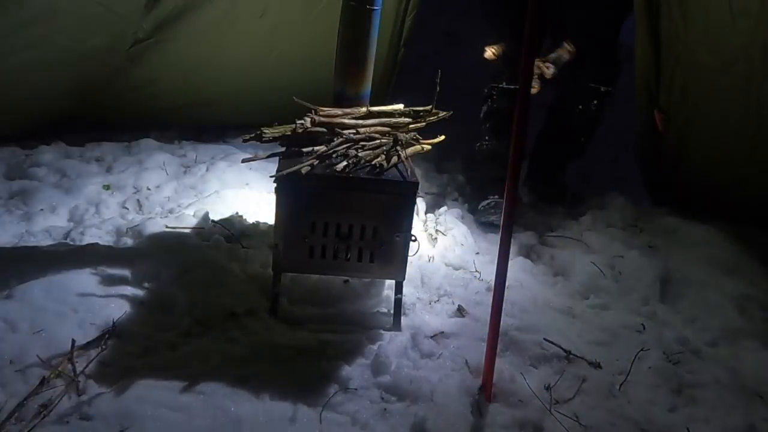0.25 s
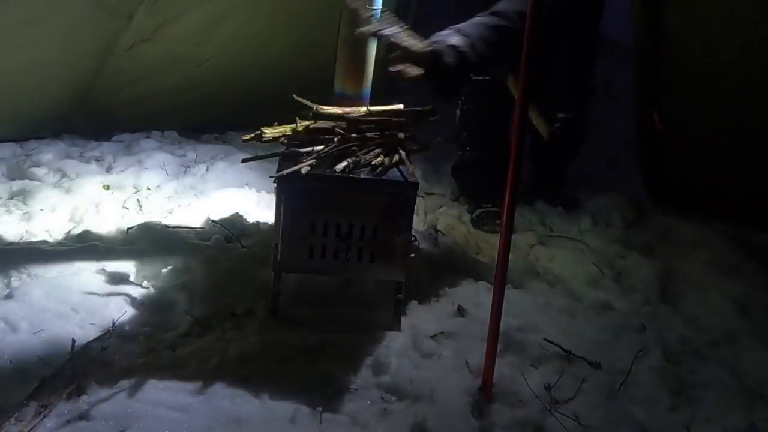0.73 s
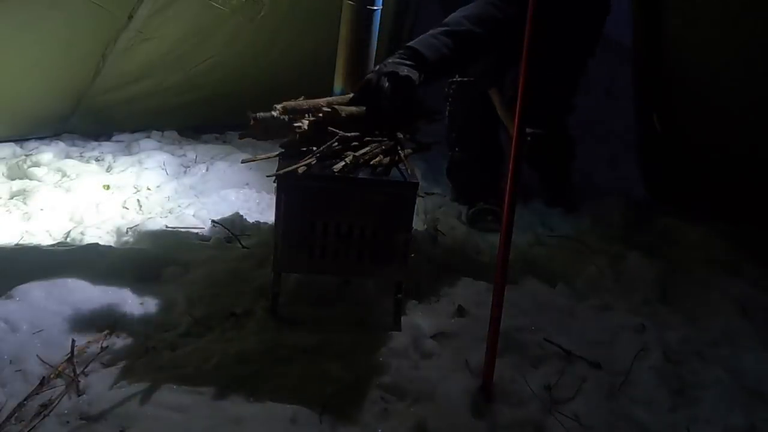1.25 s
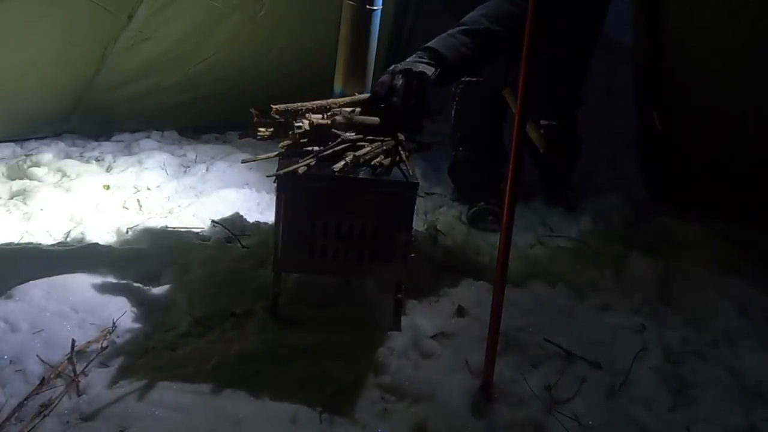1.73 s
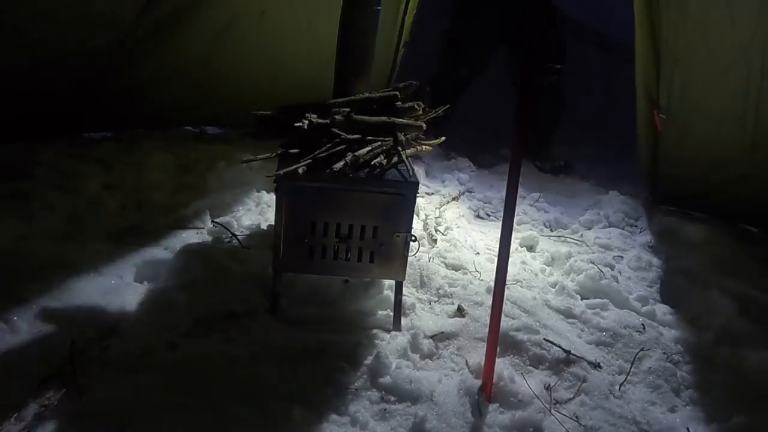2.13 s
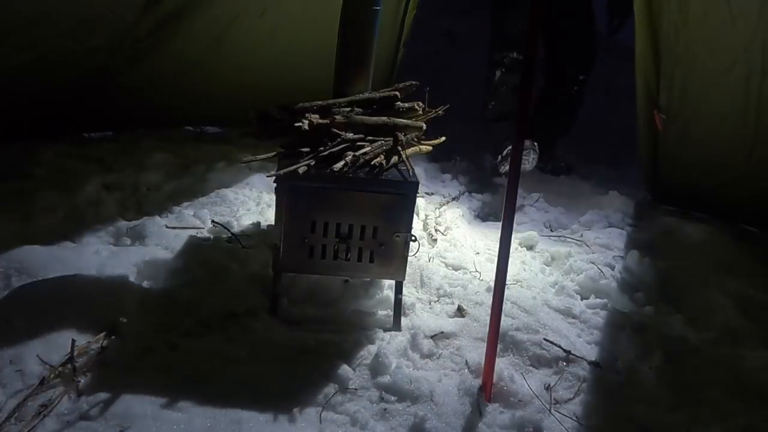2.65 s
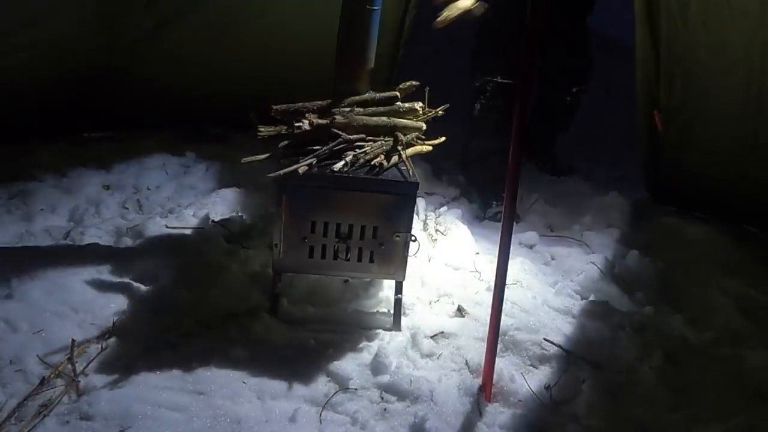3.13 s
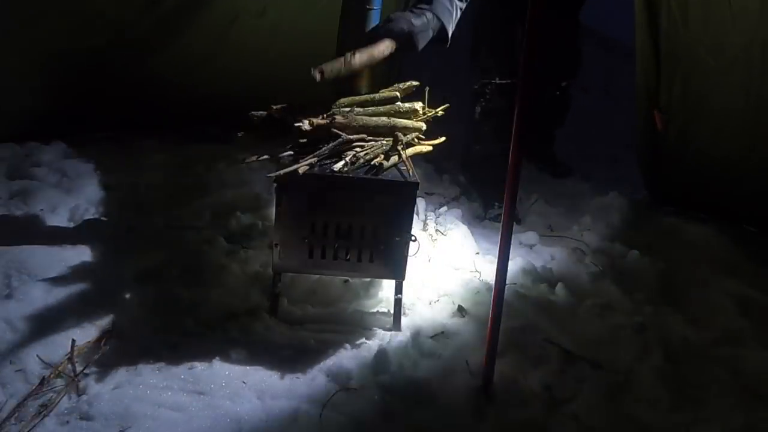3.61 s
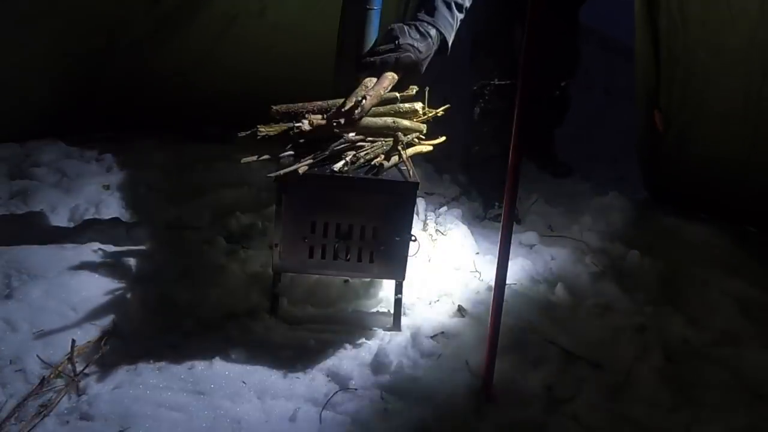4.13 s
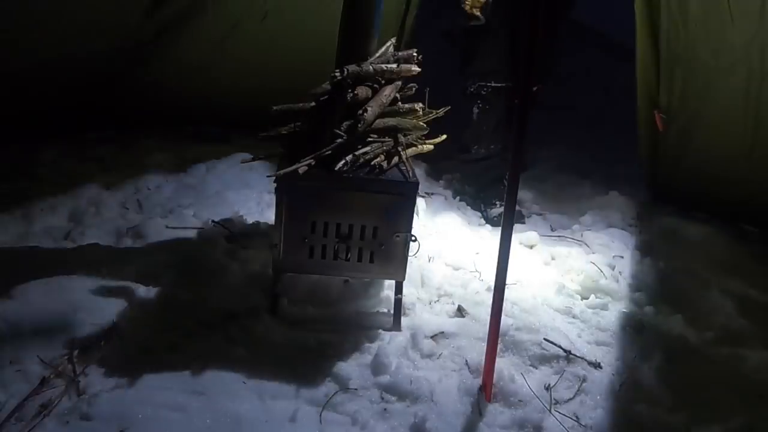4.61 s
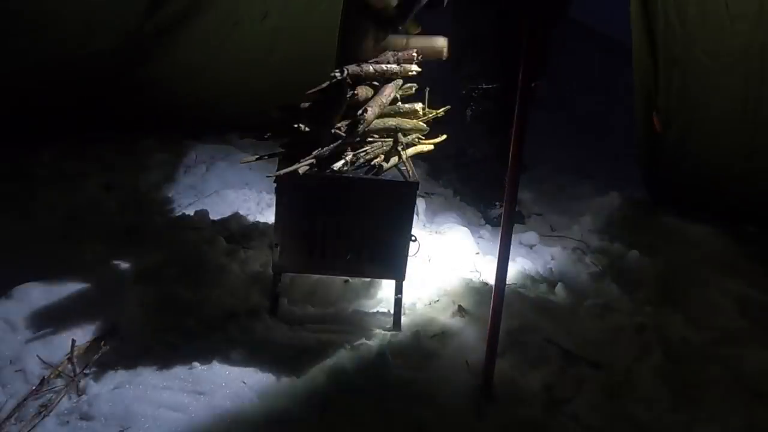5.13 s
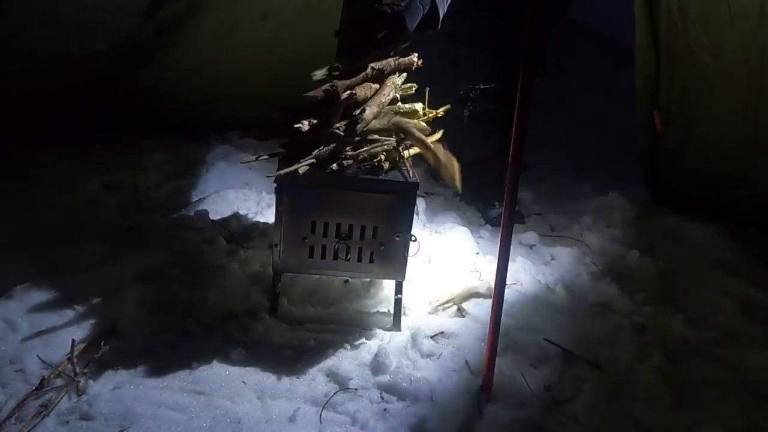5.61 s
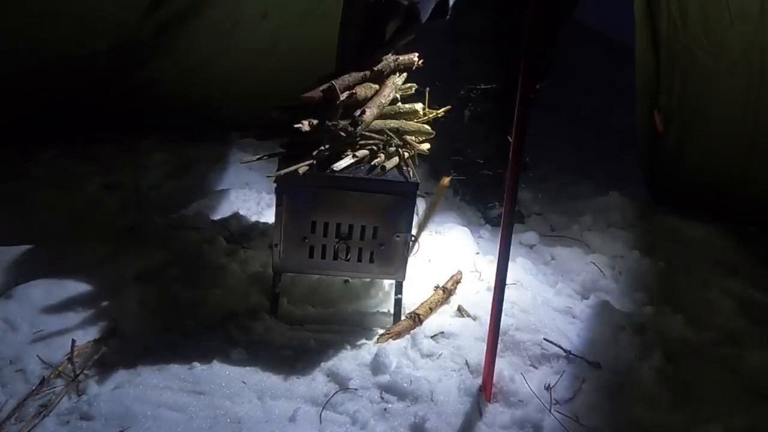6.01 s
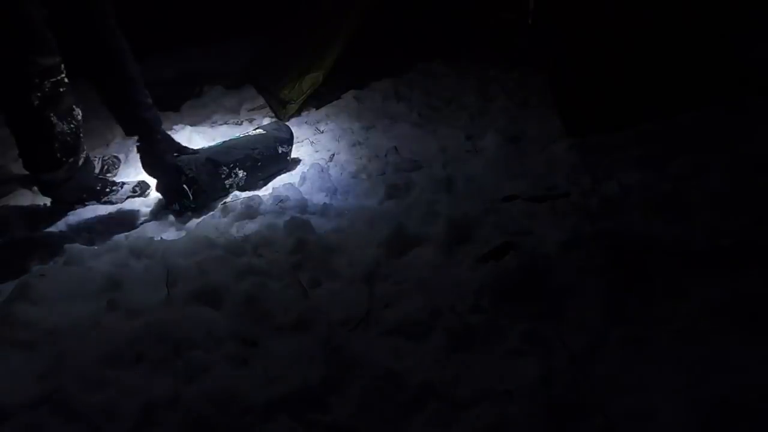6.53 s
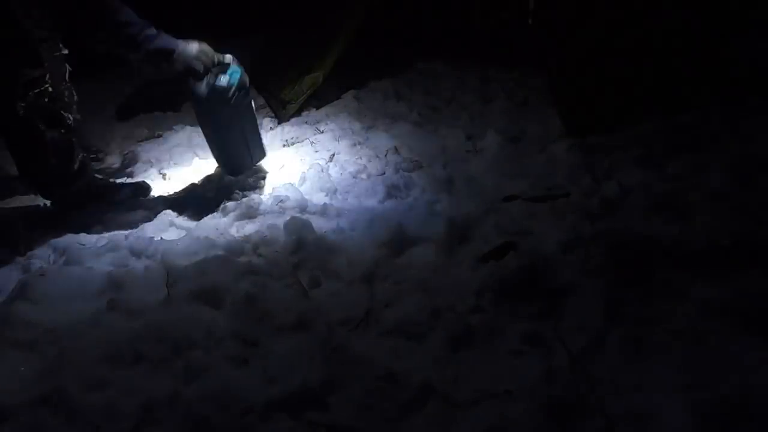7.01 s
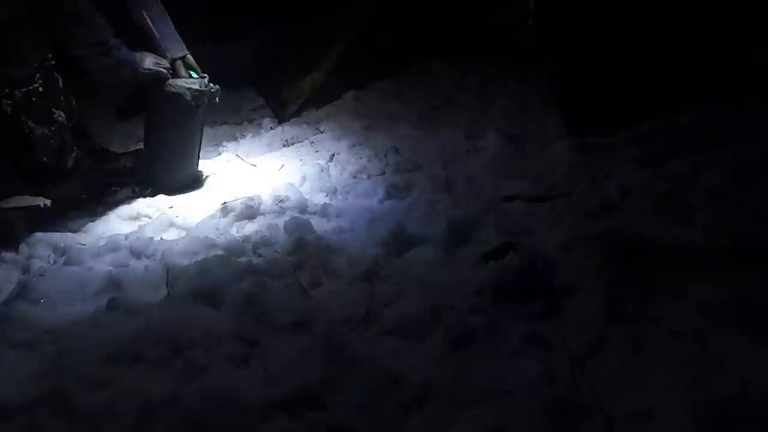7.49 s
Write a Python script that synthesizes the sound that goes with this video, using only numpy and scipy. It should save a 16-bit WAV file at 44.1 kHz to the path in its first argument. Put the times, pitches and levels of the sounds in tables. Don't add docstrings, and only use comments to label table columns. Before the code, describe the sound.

Inside a quiet tent at night, sleeves rustle and boots crunch softly in snow. A bright twig snap leads into sticks clattering onto a hollow metal stove box. After lighter ticks, more wood knocks down, ending with a hard thump and a stick rattling off. Then a stiff bag crackles and is set down in snow. Close stereo microphone, faint low wind, very short dull canvas echoes.

```python
import sys
import numpy as np
from scipy import signal
from scipy.fft import rfft, irfft, next_fast_len
from scipy.io import wavfile

SR = 44100
rng = np.random.default_rng(int(sys.argv[2]) if len(sys.argv) > 2 else 0)


def linear_from_db(decibels):
    return 10 ** (np.asarray(decibels, float) / 20)


def master_out(mix):
    frames = np.transpose(np.atleast_2d(mix))
    ceiling = np.clip(frames, -1, 1)
    pcm = np.round(ceiling * 32767).astype(np.int16)
    wavfile.write(sys.argv[1], SR, pcm)


N = 342216
BAG_FROM_S = 6.45


def rms_one(x):
    return x / np.sqrt(np.mean(x ** 2) + 1e-20)


def peak_one(x):
    return x / np.abs(x).max()


def at_hz(points, hz):
    table_hz, values = np.transpose(points)
    return np.interp(np.log(hz), np.log(table_hz), values)


def band(x, low_hz, high_hz):
    return signal.sosfilt(signal.butter(2, [low_hz, min(high_hz, 19000)], "band", fs=SR, output="sos"), x)


def resonance(x, hz, width_hz):
    r = np.exp(-np.pi * width_hz / SR)
    poles = [1, -2 * r * np.cos(2 * np.pi * hz / SR), r * r]
    return signal.lfilter([(1 - r * r) / 2, 0, (r * r - 1) / 2], poles, x)


def decay(t, t60_s):
    return linear_from_db(-60 * t / t60_s)


def drift(rate_hz):
    r = np.exp(-80 * np.pi * rate_hz / SR)
    slow = signal.lfilter([1], [1, -2 * r, r * r], rng.standard_normal(N // 40 + 2002))[2000:]
    return np.interp(np.arange(N) / 40, np.arange(len(slow)), rms_one(slow))


def grains(per_s, spread_db):
    sizes = linear_from_db(spread_db * np.minimum(rng.exponential(1, (4, N)), 5)) * rng.standard_normal((4, N))
    return sizes * (rng.random((4, N)) < per_s / SR) + 1e-18


# f/Hz, likeness
LIKENESS = [(60, 1), (180, 0.51), (550, 0.66), (1650, 0.97), (4970, 0.89), (9000, 0.92), (15000, 0.5)]


def colour(source, spectrum, patchy_db, gain_by_hz=lambda hz: 1):
    out, power = 0, 0
    edges_hz = 20 * 2 ** np.arange(0, 9.7, 1 / 3)
    for k, (low, high) in enumerate(zip(edges_hz, edges_hz[1:])):
        hz = np.sqrt(low * high)
        if hz < .8 * spectrum[0][0]:
            continue
        mid, side = band(source[k % 2::2], low, high)
        alike = np.clip(at_hz(LIKENESS, hz), 0, 1)
        stereo = np.sqrt(1 + alike) * mid + np.sqrt(1 - alike) * side * [[1], [-1]]
        part = linear_from_db(at_hz(spectrum, hz) + patchy_db * drift(9.9)) * stereo
        power += np.mean(part ** 2)
        out = out + part * gain_by_hz(hz)
    return out / np.sqrt(power)


# f/Hz, density/dB per Hz
NIGHT = [(59, -50), (100, -31), (131, -9), (236, -4.5), (262, -9.5), (849, -32), (2690, -24), (2860, -25.5),
         (5480, -21), (11900, -35), (15000, -66)]


def night_air():
    return linear_from_db(-63) * colour(rng.standard_normal((4, N)), NIGHT, 2.0)


# t/s, level/dB
GUSTS = [(0.0, -67), (1.34, -57.5), (1.601, -62), (2.9, -60), (3.3, -64), (3.8, -56), (4.93, -75.5),
         (5.3, -54.5), (5.55, -62), (6.1, -65), (6.35, -57.5), (7.07, -64.5), (7.76, -57.5)]


def gusts():
    s, gust_db = np.transpose(GUSTS)
    air = resonance(rng.standard_normal(N), 62.3, 24) + .5 * band(rng.standard_normal(N), 21, 56)
    level_db = np.interp(np.arange(N) / SR, s, gust_db) + 4.2 * drift(28)
    return linear_from_db(level_db) * rms_one(band(air, 19, 122)) * [[linear_from_db(-.5)], [linear_from_db(.5)]]


def bump():
    start_s, peak_db = .301, -25
    out, t = np.zeros(N), np.arange(SR // 20) / SR
    swing = np.minimum(t / 0.00066, 1) * np.cos(2 * np.pi * 110 * t) * np.exp(-t / 0.0024)
    out[round(start_s * SR):][:len(t)] = linear_from_db(peak_db) * swing
    return out


def gesture(t, s, hold_s, db, change_db, rise_s, fall_s):
    edge = np.maximum(s - t, 0) / max(rise_s, .005) + np.maximum(t - s - hold_s, 0) / max(fall_s, .005)
    return linear_from_db(db + change_db * np.clip((t - s) / max(hold_s, .005), 0, 1) - 20 * np.minimum(edge, 5))


MOVE_RISE_S, MOVE_FALL_S, MOVE_CRUNCH_DB = 0.078, 0.055, -8
SETTLE_RISE_S, SETTLE_FALL_S, STROKE_EDGE_S = 0.02, 0.11, 0.015
STILL_DB = -80.5
DULL_PER_WEIGHT, BRIGHT_DB, BAG_DULL_DB = 0.37, -3.5, -6.5


def squeak():
    start_s, length_s, level_db, seam_hz = 2.3, 0.33, -67.5, 2580
    out, t = np.zeros(N), np.arange(SR) / SR + start_s - .2
    tone = rms_one(resonance(rng.standard_normal(SR), seam_hz, 450))
    stroke = gesture(t, start_s, length_s, level_db, -1.0, MOVE_RISE_S, 0.063)
    out[round(t[0] * SR):][:SR] = stroke * tone
    return out


# t/s, length/s, level/dB, change over move/dB, weight/dB
MOVES = [(0, 0.34, -56.5, 1, -3.5), (0.382, 0.16, -50, -0.5, -7.5), (0.564, 0.26, -53, -2, -5),
         (0.895, 0.05, -57.5, 3.5, 13), (0.978, 0.17, -58, -5.5, 8), (1.606, 0.15, -62, 4, 8.5),
         (1.825, 0.26, -58, -18, 8), (2.054, 0.2, -55, 3.5, -6), (2.302, 0.28, -60.5, -11.5, -15),
         (2.879, 0.34, -56, 1.5, 1.5), (3.603, 0.28, -62, -1.5, -2), (3.907, 0.21, -56, -7.5, 6),
         (4.185, 0.13, -56, -2.5, 6.5), (4.428, 0.29, -59, -5.5, 3.5), (4.799, 0.46, -47.5, -2.5, -9),
         (5.316, 0.29, -54, 2, 7), (5.725, 0.17, -49, -10, 3.5), (6.078, 0.14, -64.5, 10, 0),
         (6.238, 0.19, -57.5, -1, -2), (6.442, .08, -60.5, 2, -0.5), (6.545, .07, -54.5, 1, 1.5),
         (6.63, 0.51, -53.5, 5.5, -3), (7.192, 0.2, -58.5, -2, 5.5), (7.402, 0.08, -46.5, 10, -15),
         (7.562, 0.18, -52, -11.5, -1)]
# t/s, hold/s, level/dB, weight/dB, crunch/dB
SETTLES = [(0.785, 0.058, -51, 9.5, 9.5), (1.187, 0.07, -40.5, 7, 0), (1.5, 0.018, -54.5, 13.5, -1),
           (3.854, 0.015, -52.5, 12.5, -3), (4.147, 0.0095, -43, 2, -0.5), (4.37, .01, -68, 23, 12),
           (5.265, 0.061, -47.5, -4, -2.5), (5.637, .02, -56, 22.5, 2), (5.662, 0.0081, -37.5, 3.5, 4),
           (5.99, 0.012, -46.5, 18.5, 4), (6.607, 0.011, -49.5, 8, 1.5), (6.914, 0.058, -49, -1, 3.5),
           (7.427, 0.024, -46.5, 6, 12.5), (7.614, 0.0063, -47, -0.5, -2)]
# t/s, length/s, level/dB, change over stroke/dB, weight/dB
STROKES = [(1.193, .11, -36, -11.5, 1), (1.414, 0.1, -65, 6, 14), (1.463, .035, -62, 0, 0),
           (4.23, .025, -53, 0, 0), (4.29, .02, -54, -2, -4), (4.472, 0.052, -58, 0, -1),
           (5.908, 0.011, -44, 0.5, 0), (7.39, .04, -57, 4, 0), (1.648, 0.068, -56, 0.5, -10),
           (2.819, 0.072, -53, 0, -3), (3.245, 0.32, -51.5, 3.5, -7.5), (4.137, 0.034, -43, 2.5, -8),
           (4.331, 0.028, -46, -0.5, 7), (5.665, 0.0089, -32, -3, 1), (6.84, 0.074, -57.5, 5, 5.5),
           (7.13, 0.047, -57, 0, -7), (7.488, 0.022, -44.5, 6, -16)]


def handling():
    t = np.arange(0, N / SR, .002)
    rows = [(gesture(t, s, length, db, change_db, MOVE_RISE_S, MOVE_FALL_S), weight_db, MOVE_CRUNCH_DB)
            for s, length, db, change_db, weight_db in MOVES]
    rows += [(gesture(t, s, hold, db, 0, SETTLE_RISE_S, SETTLE_FALL_S), weight_db, crunch_db)
             for s, hold, db, weight_db, crunch_db in SETTLES]
    rows += [(gesture(t, s, length, db, change_db, STROKE_EDGE_S, STROKE_EDGE_S), weight_db, MOVE_CRUNCH_DB)
             for s, length, db, change_db, weight_db in STROKES]
    rows += [(linear_from_db(STILL_DB), 3.0, MOVE_CRUNCH_DB)]
    swish = 10 * np.log10(sum(gain ** 2 for gain, weight_db, crunch_db in rows))
    boom = 10 * np.log10(sum((gain * linear_from_db(weight_db)) ** 2 for gain, weight_db, crunch_db in rows))
    crunch = 10 * np.log10(sum((gain * linear_from_db(crunch_db)) ** 2 for gain, weight_db, crunch_db in rows))
    bright = BRIGHT_DB - DULL_PER_WEIGHT * (boom - swish) + BAG_DULL_DB * (t > BAG_FROM_S)
    return [np.interp(np.arange(N) / SR, t, curve) for curve in (swish, bright, crunch, boom)]


# f/Hz, density/dB per Hz
SWISH = [(410, -6), (700, -2), (848, -34.5), (1300, 13.5), (1590, -16.5), (1930, 8), (2340, -2.5),
         (2980, -2.5), (3430, -2.5), (6350, -3), (12200, -18), (13700, -10), (15000, -36)]
# f/Hz, width/Hz, level/dB
WEAVE = [(1350, 180, -5), (2655, 41, -8), (3810, 490, -10)]


def sleeves(swish_db, bright_db):
    def tilt(hz):
        if hz <= 2500:
            return 1
        return linear_from_db((bright_db + 1.0) * np.clip(np.log2(hz / 2500) / 2.2, 0, 1))

    rub = colour(grains(5000, 0.54), SWISH, 1.83, tilt)
    rub = rub + sum(linear_from_db(db + 2.5 * drift(18.0)) * resonance(rub, hz, width) for hz, width, db in WEAVE)
    clumps_db = np.where(np.arange(N) > BAG_FROM_S * SR, 3.5, 1) * drift(150)
    return linear_from_db(swish_db + 0.5 + 1.0 * drift(5.7) + clumps_db) * rub


def snow(crunch_db):
    crust = grains(900, 2.04)
    out = sum(resonance(crust[k], hz, 155) for k, hz in enumerate((545, 645, 986, 1450)))
    return linear_from_db(crunch_db - 3.5) * rms_one(out)


def snap_bursts(table):
    out, t = np.zeros(N + SR), np.arange(SR // 10) / SR
    for s, db, hz, top_db, t60 in table:
        white = rng.standard_normal(len(t))
        burst = (white + 9.8 * (t == 0)) * decay(t, np.clip(t60, .003, .1))
        ring = peak_one(resonance(burst, hz, max(0.15 * hz, 300)))
        low = ring + 0.67 * peak_one(band(burst, 0.52 * hz, 1.37 * hz))
        top = peak_one(band(burst, 5800, 7170))
        out[round(s * SR):][:len(t)] += linear_from_db(db - 0.5) * peak_one(low + linear_from_db(top_db) * top)
    return out[:N]


# t/s, peak/dB, ring f/Hz, top/dB
POPS = [(1.205, -30, 1100, -15), (1.26, -28, 2500, -8), (1.275, -35, 2000, -10), (2.845, -40, 1400, -15),
        (4.045, -44, 2800, -18), (4.565, -51, 1600, -20), (4.635, -44.5, 1390, -20),
        (4.4215, -45, 10000, -10), (4.4385, -39, 10000, -5), (6.148, -33, 10000, -5),
        (6.5336, -20, 2000, -27), (6.569, -41, 1900, -15), (6.6065, -28.5, 4500, -9),
        (6.725, -35, 4000, -11), (6.928, -32, 3200, -10), (6.634, -28, 1480, -20), (6.689, -43, 2170, -20),
        (6.742, -37, 1700, -20), (6.812, -34.5, 2500, -10), (6.83, -42, 1260, -20), (6.869, -36, 1830, -20),
        (6.895, -43, 2200, -15), (6.945, -33, 1200, -15), (6.986, -29, 1700, -15), (7.02, -44, 1000, -15),
        (7.046, -40, 1380, -10), (7.09, -38, 1300, -15), (7.433, -28, 1110, -15), (7.455, -27, 900, -15),
        (7.472, -26, 1500, 1), (7.49, -32, 1500, -8), (7.508, -30, 2500, -2), (7.556, -37, 2290, -20)]


def pops():
    return snap_bursts([row + (.014,) for row in POPS])


# t/s, peak/dB, ring f/Hz, top/dB
CREASES = [(6.505, -39.5, 1260, -25), (6.533, -28, 2630, -33), (6.616, -32, 1540, -22),
           (6.646, -28.5, 2150, -20), (6.724, -28, 1890, -38), (6.782, -30.5, 1450, -14),
           (6.803, -30.5, 1200, -18), (6.908, -31.5, 930, -12), (6.927, -22.5, 1140, -24),
           (6.978, -31, 1145, -21), (7.002, -28, 1070, -14), (7.081, -37, 1350, -14), (7.11, -32, 977, -18),
           (7.137, -37, 2110, -12), (7.226, -38.5, 1490, -15), (7.265, -31.5, 1340, -25),
           (7.442, -44, 1160, -25), (7.4625, -24.5, 1480, -2), (7.518, -26, 1540, -3),
           (7.548, -35, 1370, -10), (7.618, -29, 1220, -12), (7.676, -31.5, 2000, -22),
           (7.693, -42, 1730, -8), (7.727, -36, 1460, 0)]


def creases():
    return snap_bursts([row + (0.026,) for row in CREASES])


# t/s, peak/dB, ring f/Hz, top/dB
TICKS = [
    (0.301, -37, 1280, -12),
    (2.124, -35.5, 1580, -23),
    (2.891, -30, 1560, -25),
    (2.906, -36, 1680, -25),
    (3.008, -26, 2080, -30),
    (3.098, -29.5, 2220, -31),
    (4.495, -36, 1490, -12),
    (6.3, -33.5, 2380, -20),
]
# t/s, peak/dB, ring f/Hz, top/dB, t60/s
SNAPS = [(0.7965, -8, 3600, -8, 0.029), (0.7986, -7.5, 4800, -9, 0.018), (1.1375, -31, 2780, -24, 0.023),
         (1.4747, -38, 6200, -9, 0.042), (3.6154, -40.5, 4020, -24, 0.034),
         (3.684, -40.5, 4040, -10, 0.035), (3.917, -27.5, 3580, -28, 0.043), (4.4222, -41, 3480, -2, 0.022),
         (4.436, -40, 5730, -11, 0.033), (5.361, -38, 4670, -5, 0.038), (5.5777, -20, 5030, -27, 0.042),
         (5.5755, -27, 2650, -11, 0.035), (6.6057, -29, 3900, -38, 0.0078),
         (7.1631, -31.5, 3000, -25, 0.037)]


def twigs():
    return snap_bursts([row + (0.015,) for row in TICKS] + SNAPS)


# f/Hz, width/Hz, level/dB
BOX = [(115, 13, -9.5), (144, 53, 0.5), (202, 33, 2), (264, 66, 1), (334, 74, -0.5), (406.7, 45.5, -4),
       (603, 46, -14)]


def box(drive):
    return sum(linear_from_db(db) * (-1) ** k * resonance(drive, hz, width) for k, (hz, width, db) in enumerate(BOX))


def rumble(rumble_db):
    return linear_from_db(rumble_db - 4.0) * rms_one(box(grains(700, 3.2)[0]))


# t/s, peak/dB, boom f/Hz, t60/s
THUDS = [(0.779, -36.5, 264, 0.098), (0.825, -29.5, 300, 0.096), (0.843, -31, 268, 0.066),
         (1.176, -20.5, 239, 0.056), (1.191, -25, 106.4, 0.5), (1.22, -19, 284, 0.078),
         (1.245, -21.5, 315, 0.12), (1.319, -29.5, 146.3, 0.16), (1.502, -30, 236, 0.092),
         (1.773, -34.5, 297.6, 0.19), (3.839, -30, 174, 0.072), (3.87, -35, 313, 0.19),
         (4.341, -27.5, 311.4, 0.092), (5.228, -27, 317, 0.087), (5.369, -38, 250, 0.091),
         (5.413, -36, 345, 0.087), (5.493, -33, 358, 0.084), (5.593, -21, 260, 0.072),
         (5.661, -25.5, 278, 0.05), (5.67, -25, 301, 0.12), (5.704, -30, 271, 0.06),
         (5.784, -39, 139, 0.11), (5.905, -35, 147, 0.07), (5.982, -12, 282, 0.058),
         (6.006, -28, 265.6, 0.35), (6.724, -36.5, 242, 0.3), (7.261, -41, 264, 0.08),
         (7.437, -26.5, 230, 0.089), (7.48, -26, 230, 0.075), (7.614, -44, 229, 0.085)]


def thuds():
    out, t = np.zeros(N + SR), np.arange(SR // 3) / SR
    for s, db, hz, t60 in THUDS:
        white = rng.standard_normal(len(t))
        t60 = np.clip(t60, .015, .4)
        boom = np.sin(2 * np.pi * hz * t) * decay(t, t60) * np.minimum(t / 0.0038, 1)
        heave = np.sin(2 * np.pi * 0.335 * hz * t) * decay(t, 1.6 * t60)
        body = peak_one(band(box(white * decay(t, 1.25 * t60)), 0.61 * hz, 3.5 * hz))
        out[round(s * SR):][:len(t)] += linear_from_db(db - 0.8) * peak_one(boom + 0.78 * body + 0.076 * heave)
    return out[:N]


# t/s, peak/dB, f/Hz, t60/s
RINGS = [(.797, -22.5, 7500, 0.029), (.902, -46, 2600, 0.074), (.903, -48, 3620, 0.18),
         (1.187, -28, 4000, .06), (1.188, -31, 6130, .05), (1.2, -28, 1000, .05), (1.247, -28, 1500, .06),
         (1.222, -32, 4020, .05), (1.675, -50, 2740, 0.21), (2.822, -48, 1650, 0.26),
         (3.455, -48, 2900, .2), (3.47, -47, 1910, 0.23), (5.577, -30, 4730, .04), (6.0, -37, 747, 0.13),
         (6.305, -43.5, 140, .3), (1.227, -20, 268, 0.056), (1.245, -31, 295, .06),
         (5.416, -36, 570, 0.066), (5.493, -34.5, 587, 0.1), (5.493, -37, 1427, 0.13),
         (5.575, -33, 1140, 0.059), (5.577, -35, 2700, 0.037), (5.595, -23, 330, .06),
         (5.597, -39, 546, 0.074), (5.666, -30.5, 2120, 0.09), (5.6, -38, 1550, .06),
         (5.666, -33.5, 1430, 0.19), (5.668, -29.5, 923, 0.096), (5.984, -30.5, 564, 0.33),
         (5.985, -37, 1006, 0.22), (5.984, -34, 1437, 0.12), (5.988, -25.5, 1873, 0.091),
         (5.988, -38, 2283, .12), (5.988, -30, 2961, .08), (6.058, -21.5, 2740, 0.062),
         (6.058, -31, 1110, 0.096), (6.075, -34, 1427, .07), (6.076, -36, 1755, 0.11),
         (6.147, -53, 2740, 0.049), (6.3, -40.5, 523, 0.031), (7.262, -42.5, 620, .06)]


def rings():
    out, t = np.zeros(N + SR), np.arange(SR // 2) / SR
    for s, db, hz, t60 in RINGS:
        white = rng.standard_normal(len(t))
        waver = .9 * np.sin(2 * np.pi * hz * t) + .4 * rms_one(resonance(white, hz, 40 + .05 * hz))
        fade = linear_from_db(db) * decay(t, np.clip(t60, .02, .5))
        out[round(s * SR):][:len(t)] += fade * np.minimum(t / 0.0014, 1) * waver
    return out[:N]


# f/Hz, level/dB
STICK = [(1110, -1), (1430, 8), (1790, 11), (2770, -7)]


def rebound():
    start_s, peak_db = 6.056, -24
    out, t = np.zeros(N), np.arange(SR // 8) / SR
    rattle = rng.standard_normal(len(t)) * np.minimum(t / .004, 1) * decay(t, 0.099)
    ring = sum(linear_from_db(db) * peak_one(resonance(rattle, hz, 97)) for hz, db in STICK)
    out[round(start_s * SR):][:len(t)] = linear_from_db(peak_db) * peak_one(ring)
    return out


# f/Hz, level/dB
PLATE = [(990, -11), (1150, -8), (1440, 2.5), (1800, -3), (2100, -8), (2760, -0.5), (4050, -1), (5040, -43)]
# t/s, peak/dB, ring f/Hz, top/dB, ring/dB
KNOCKS = [(1.18, -15.5, 1487, -27, 5), (1.184, -21, 5030, -10, 23), (1.198, -39, 985, -13, 12),
          (1.247, -18.5, 1180, -13, -11), (1.774, -39, 1450, 10, 2), (1.825, -32, 973, 4.5, -8),
          (3.498, -35, 1270, -15, 2), (3.867, -44, 990, -10, 6), (4.132, -23, 1540, 25, 14),
          (4.235, -33, 1510, 0, -10), (5.228, -23.5, 1440, 4.5, 0.5), (5.416, -26, 960, -12, -8),
          (5.597, -23.5, 1520, -11, -10), (5.657, -15, 3400, -4, -13), (5.804, -32.5, 5270, -15, 14),
          (5.908, -22.5, 4600, -20, -12), (5.946, -30, 4600, -4, 7), (6.057, -30, 2720, -31, 14),
          (6.147, -33, 5700, -9, -10)]
# t/s, peak/dB, ring f/Hz, top/dB, ring/dB
SLIDES = [(.903, -37.5, 2570, -34, -13), (1.225, -27, 1050, -10, 3), (1.503, -36.5, 1350, -3, 0),
          (2.889, -34.5, 1600, -13, -8), (3.252, -33, 3760, -7, -4), (3.841, -29.5, 1367, -2, -10),
          (4.158, -29.5, 1497, -16, -8), (4.341, -29.5, 1340, -13, -12), (5.259, -20.5, 1420, 15, -6),
          (5.492, -30.5, 1257, -25, -9), (5.984, -9.5, 1385, 0.5, -10.5), (7.431, -29, 1180, -18, 4)]


def clacks():
    knock_t60_s, slide_t60_s = 0.13, 0.18
    out, t = np.zeros(N + SR), np.arange(SR // 4) / SR
    table = [row + (knock_t60_s,) for row in KNOCKS] + [row + (slide_t60_s,) for row in SLIDES]
    for s, db, hz, top_db, ring_db, t60 in table:
        white, size = rng.standard_normal((2, len(t)))
        fade = decay(t, np.clip(t60, .02, .4))
        burst = white * linear_from_db(4.4 * size) * fade * np.minimum(t / 0.0005, 1)
        stick = peak_one(resonance(burst, hz, 0.029 * hz))
        plate = sum(linear_from_db(level + 3.3 * z) * resonance(burst, mode, 0.019 * mode + 15)
                    for (mode, level), z in zip(PLATE, size))
        knock = peak_one(band(burst, 0.37 * hz, 1.89 * hz))
        low = linear_from_db(ring_db) * stick + 1.8 * knock + 0.43 * peak_one(plate)
        top = peak_one(band(burst * fade ** 0.58, 1900, 6830))
        out[round((s - .0012) * SR):][:len(t)] += linear_from_db(db - 3.0) * peak_one(low + linear_from_db(top_db) * top)
    return out[:N]


def scatter(x):
    t = np.arange(SR // 100) / SR
    bounces = rms_one(rng.standard_normal(len(t))) * decay(t, 0.0044)
    treble = band(signal.fftconvolve(x, bounces)[:N], 4300, 24000)
    return linear_from_db(-20) * treble * [[1], [-1]]


def tent(x):
    t60_s, canvas_cut_hz = 0.089, 2300
    size = next_fast_len(N + SR // 2)
    w = 2 * np.pi * np.arange(size // 2 + 1) / size
    dull = 1 / np.sqrt(1 + (w * SR / (2 * np.pi * canvas_cut_hz)) ** 2)
    out = np.zeros((2, len(w)), complex)
    for k, lag in enumerate((rng.uniform(0.0044, 0.013, 12) * SR).astype(int)):
        loop = decay(lag / SR, t60_s) * dull * np.exp(-1j * w * lag)
        out[k % 2] += loop / (1 - loop) * (-1) ** (k // 2)
    return irfft(out * rfft(x, size), size)[:, :N]


def scene():
    swish_db, bright_db, crunch_db, rumble_db = handling()
    hits = clacks() + twigs() + creases() + snow(crunch_db)
    lows = rumble(rumble_db) + thuds()
    echoes = tent(linear_from_db(-19) * hits + linear_from_db(-34) * lows)
    background = night_air() + gusts() + bump()
    cloth = sleeves(swish_db, bright_db) + squeak()
    direct = hits * linear_from_db([[-.4], [.4]]) + scatter(hits) + lows
    return background + cloth + direct + echoes + rebound() + rings() + pops()


# f/Hz, lead/rad
LEAD = [(10, -0.0084), (1500, -0.46), (3250, -0.89), (3950, -0.47), (5700, -0.27), (11000, -0.021),
        (20000, 0.01)]


def microphone(dry):
    size = next_fast_len(N)
    hz = np.maximum(np.arange(size // 2 + 1) * SR / size, 1)
    lead = np.exp(1j * np.interp(hz, *np.transpose(LEAD)))
    left = irfft(rfft(dry[0], size) * lead, size)[:N]
    capsule = signal.butter(4, 13800, fs=SR, output="sos")
    return signal.sosfilt(capsule, np.stack([left, dry[1]]))


def band_limit(x):
    return signal.sosfilt(signal.butter(12, 15600, fs=SR, output="sos"), x)


def record(dry):
    mix = microphone(dry)
    return band_limit(mix)


dry = scene()
out = record(dry)
master_out(out)
```